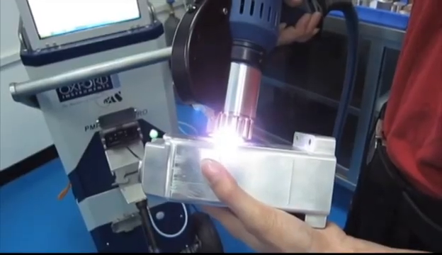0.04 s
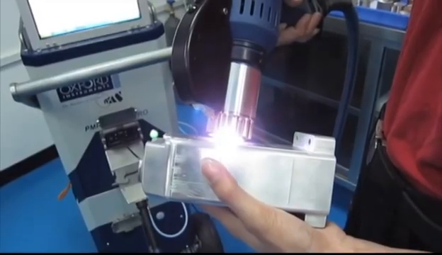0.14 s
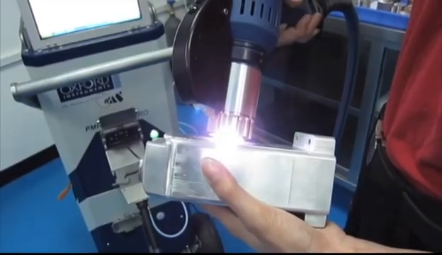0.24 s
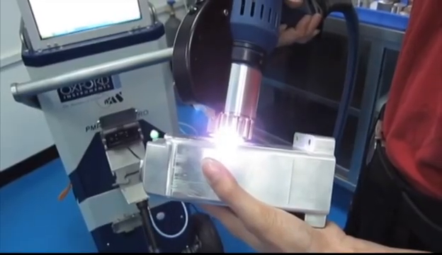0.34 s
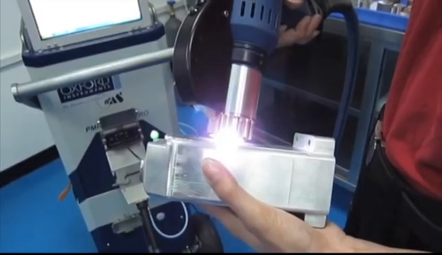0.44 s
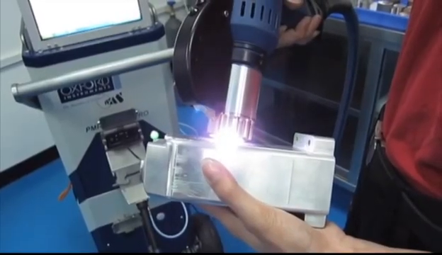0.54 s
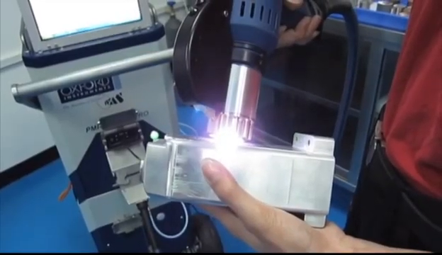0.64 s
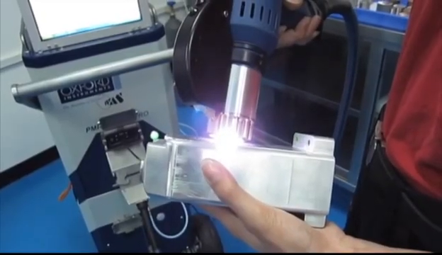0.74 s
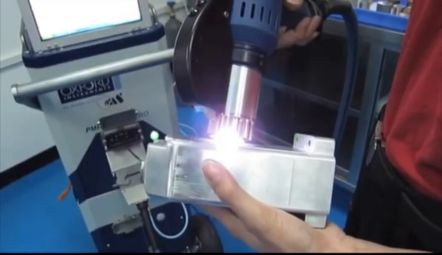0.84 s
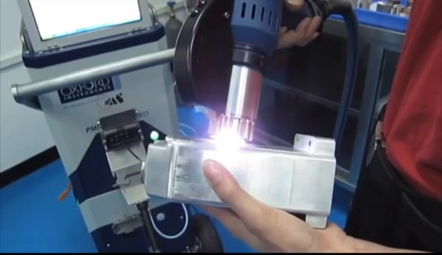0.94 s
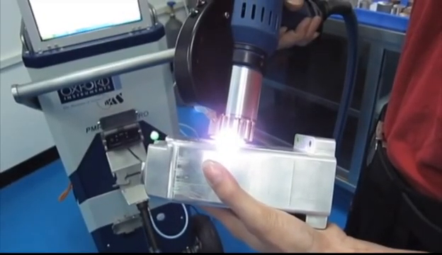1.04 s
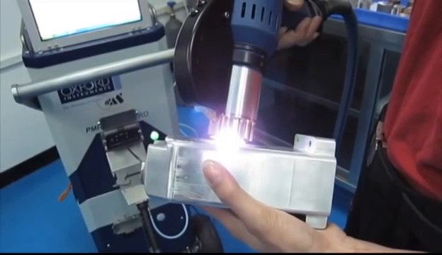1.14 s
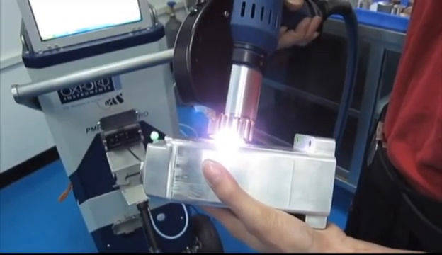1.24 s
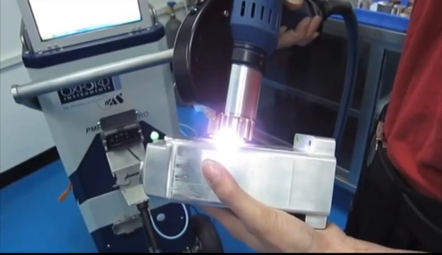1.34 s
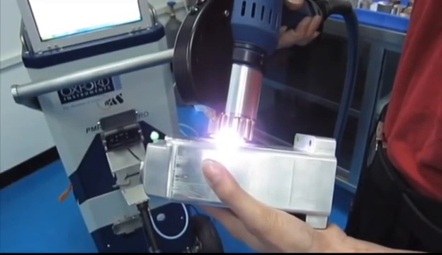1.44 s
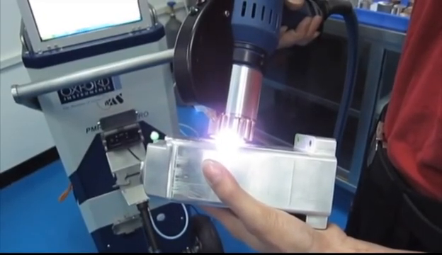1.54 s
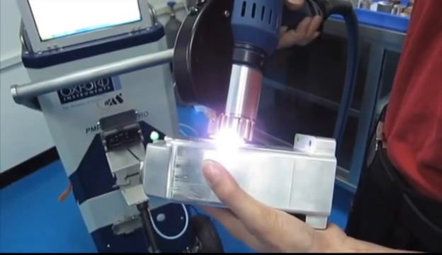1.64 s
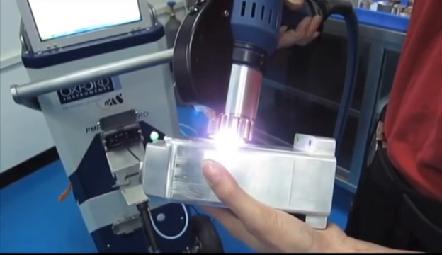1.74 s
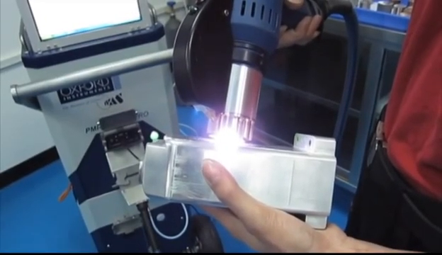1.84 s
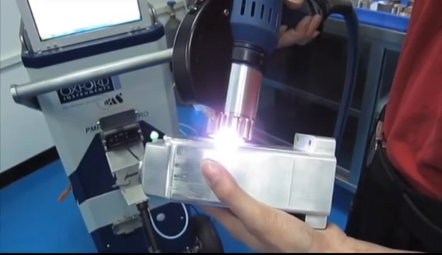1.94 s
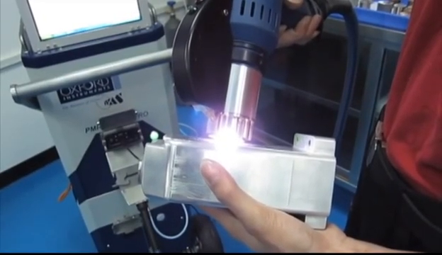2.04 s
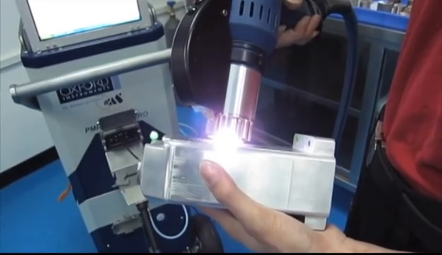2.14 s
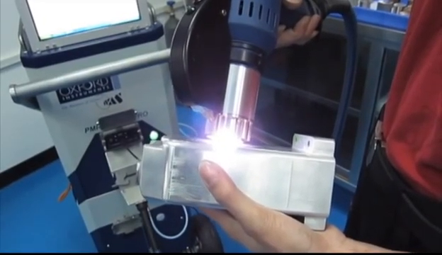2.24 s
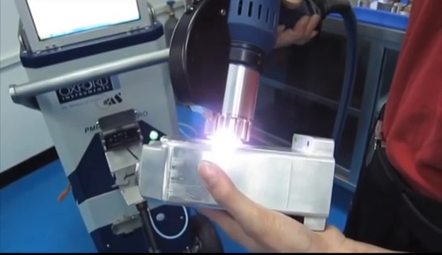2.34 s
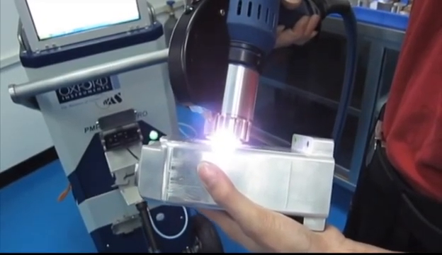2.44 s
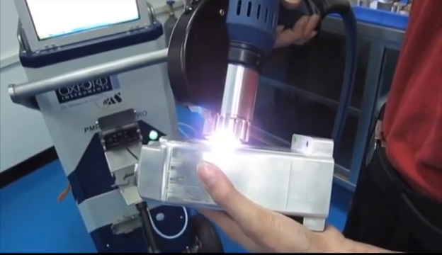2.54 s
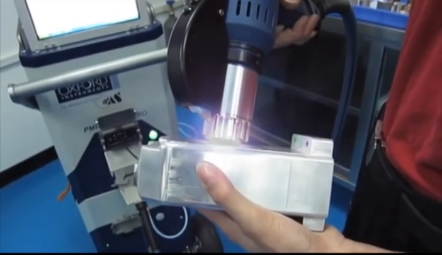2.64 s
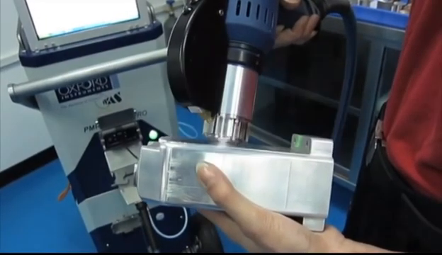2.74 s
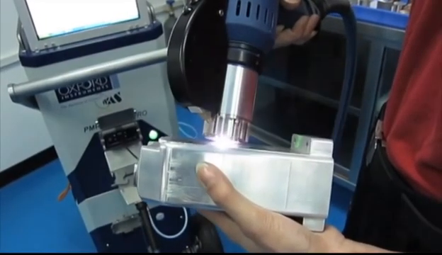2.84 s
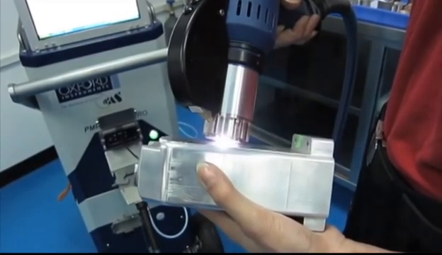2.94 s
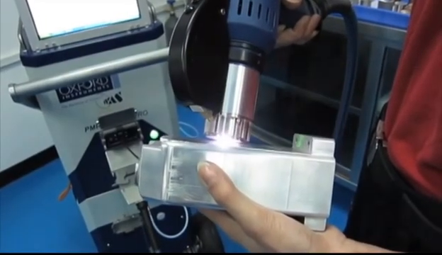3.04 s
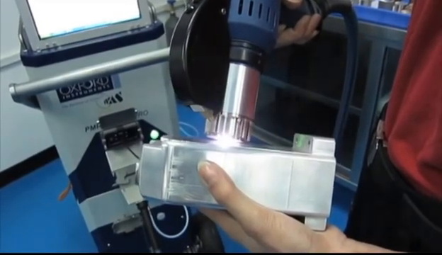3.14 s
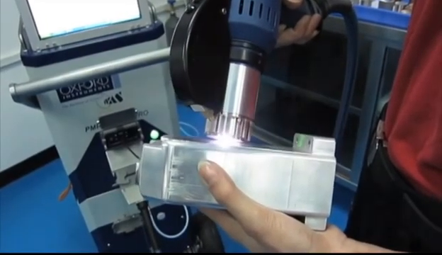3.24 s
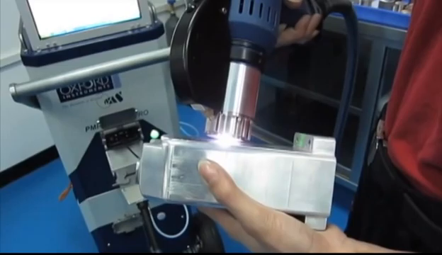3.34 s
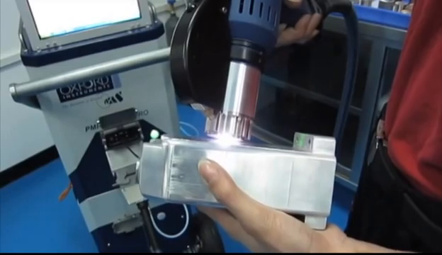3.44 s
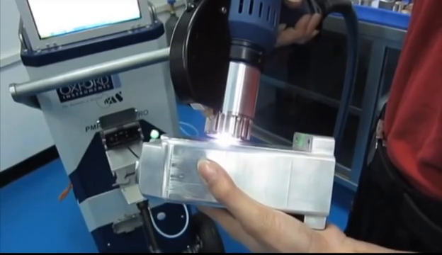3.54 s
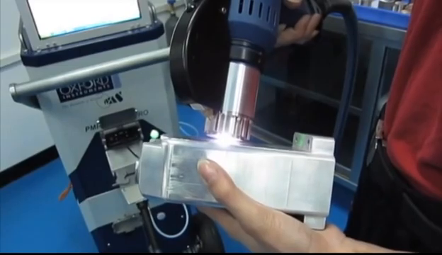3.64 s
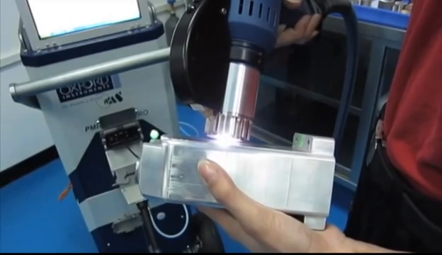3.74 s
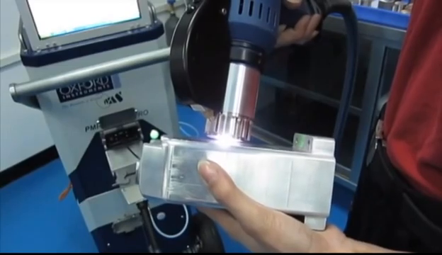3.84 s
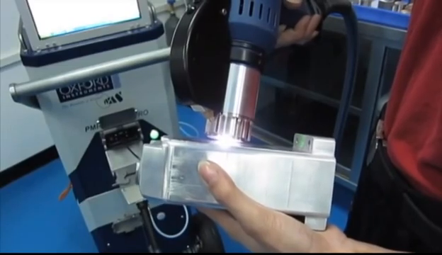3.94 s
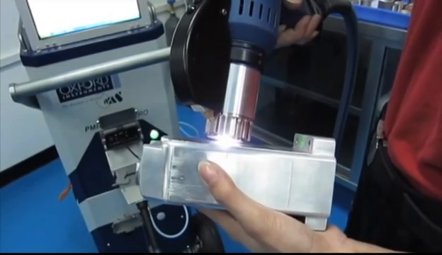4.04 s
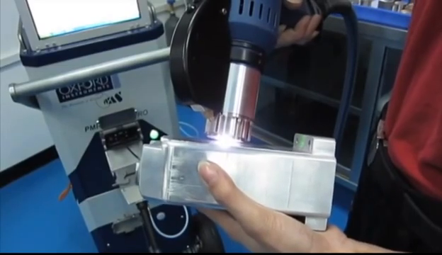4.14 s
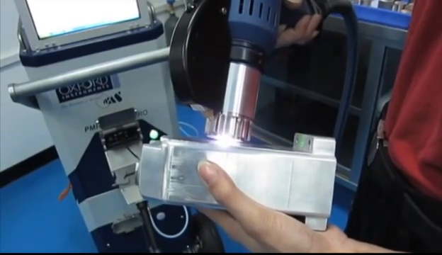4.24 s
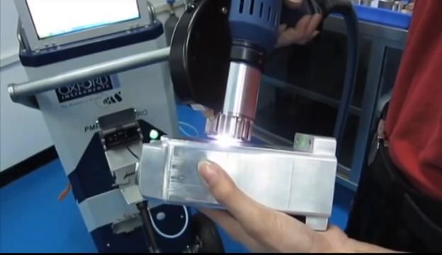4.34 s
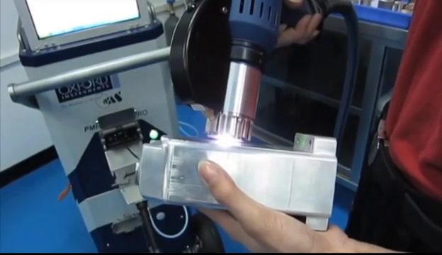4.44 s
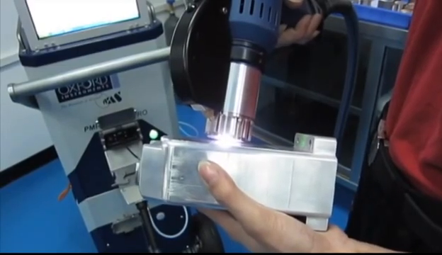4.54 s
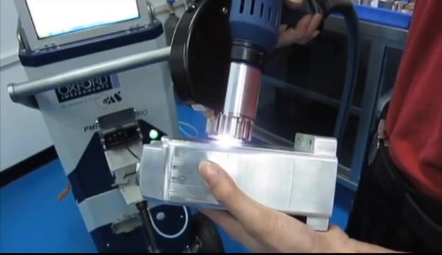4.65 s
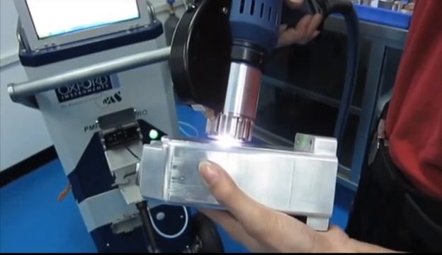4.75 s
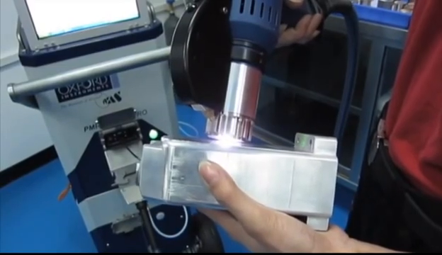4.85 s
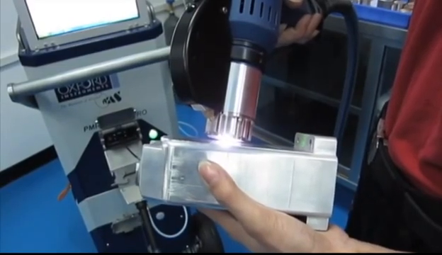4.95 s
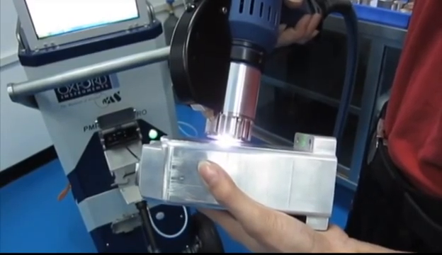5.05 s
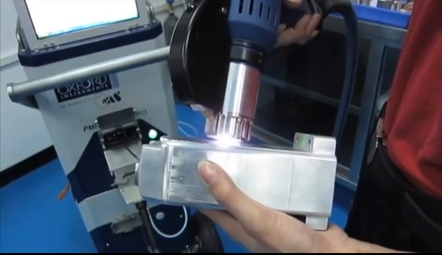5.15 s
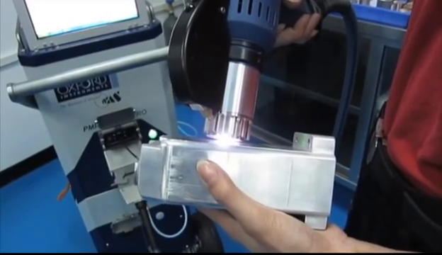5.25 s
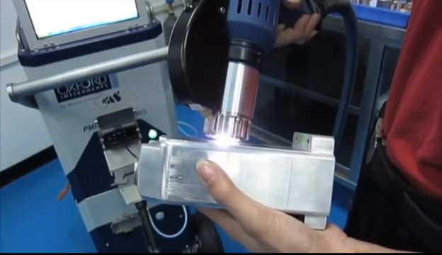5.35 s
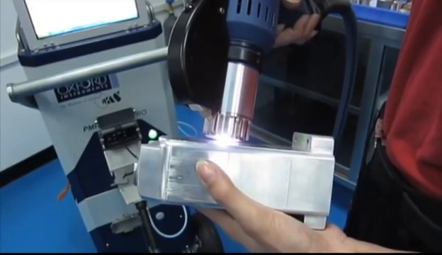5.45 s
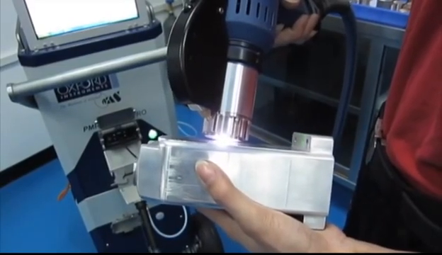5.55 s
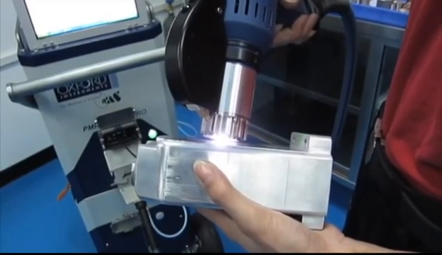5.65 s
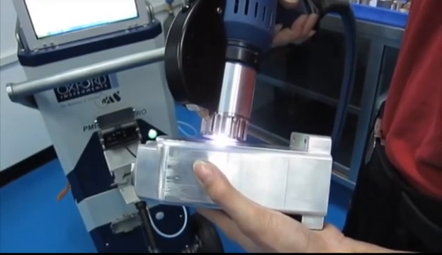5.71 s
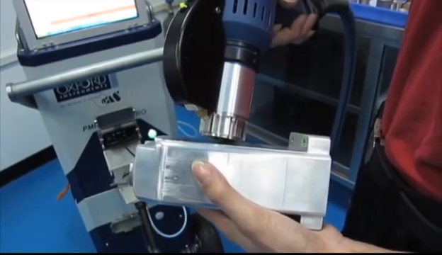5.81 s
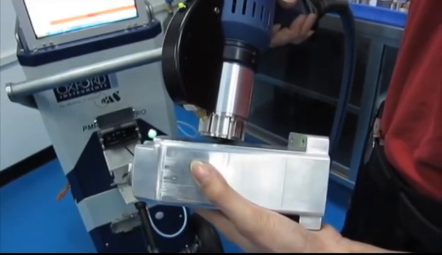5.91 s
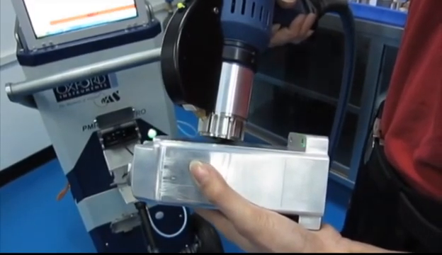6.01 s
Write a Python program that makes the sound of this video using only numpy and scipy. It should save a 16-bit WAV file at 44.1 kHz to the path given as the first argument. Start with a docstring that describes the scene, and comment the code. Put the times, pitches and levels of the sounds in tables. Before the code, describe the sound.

A handheld electric probe sparks against a metal block with a harsh, steady buzz, gritty with sizzle and sputter. Just before halfway it breaks off for an instant, then returns slightly lower and cleaner, with a few single spits. Near the end it cuts off, and the workshop rings briefly over a very faint ventilation rumble. The sparking sounds close to the microphone.

```python
"""A rough, sputtering buzz: a handheld spark probe burns a metal block, 343 sparks a second.
After a short pause comes a cleaner buzz, 291 a second, with single spits. Each spark gives the same
crack, so the train fuses into a tone; hot gas puffs out and the burning spot sizzles.
When the sparks stop, the workshop rings on over a faint ventilation rumble."""
import sys
import numpy as np
from scipy import signal
from scipy.fft import irfft
from scipy.io import wavfile
from scipy.ndimage import uniform_filter1d

SR = 44100
rng = np.random.default_rng(int(sys.argv[2]) if len(sys.argv) > 2 else 0)


def int16_out(signal):
    """Quantize to a 16-bit WAV file."""
    q = np.round(np.clip(np.atleast_2d(signal).T, -1, 1) * 32767)
    wavfile.write(sys.argv[1], SR, q.astype(np.int16))


N = 268039
TIME = np.arange(-SR, N) / SR  # the first burn is already under way at 0 s

# colour of the ventilation: f/Hz, relative level/dB
VENT_SPECTRUM = [(20, -7), (60, -30), (100, -7), (140, -13), (220, -2.5), (350, -12), (600, -13),
                 (1200, -15), (3000, -22), (8000, -42), (15000, -38)]
# diffuse tail of the workshop: f/Hz, relative level/dB, t60/s
ROOM_TAIL = [(100, -11, 0.2), (318, -30.5, 0.92), (774, -15, 1), (1950, -19.5, 1), (4300, -1, 1),
             (6060, -5, 0.8), (9250, -2, 0.51), (14900, 2, 0.28)]
# early reflections off cabinet, floor and bench: left delay/s, right delay/s, relative level/dB
EARLY_REFLECTIONS = [(.0036, 0.0046, -9.5), (.0078, 0.0089, -32), (0.0118, 0.014, -21)]
# hiss of the burning spot: f/Hz, rough relative level/dB, clean relative level/dB
SIZZLE_SPECTRUM = [(200, -9, 1), (700, 2.5, -3), (1270, 2, 3), (2500, 0.5, 3), (4480, -0.5, -1),
                   (6540, -4, -3), (7600, -7, -6), (9770, -20, -3), (11100, -21, -23), (14900, -18, -13)]
# push of hot gas from one spark: f/Hz, relative level/dB
PUFF_SPECTRUM = [(20, -8.5), (60, 0.5), (130, 7), (250, -1), (500, -4), (900, -12), (1500, -17),
                 (3000, -28.5), (5000, -46.5), (10000, -59.5)]
# single sparks that blow out harder than the rest: t/s, relative level/dB
SPIT_CUES = [(0.047, -21), (0.211, -21.5), (0.324, -29), (0.794, -21.5), (1.147, -21.5), (1.161, -25),
             (1.211, -24), (1.337, -21), (1.537, -20), (1.552, -20), (1.569, -21.5), (2.29, -22.5),
             (2.66, -29), (2.792, -30), (3.081, -28), (3.675, -29.5), (3.699, -32), (4.286, -31),
             (4.558, -27.5), (4.609, -33), (4.716, -28), (5.022, -30), (5.136, -29), (5.245, -34)]
# tone of the rough spark train, heard left and right; the lines near 11 kHz are almost silent: harmonic number,
# left level/dB, right level/dB
ROUGH_HARMONICS = [(1, -45, -43), (2, -49, -47), (3, -51, -50), (4, -53, -50), (5, -55, -48), (6, -61, -44),
                   (7, -51, -63), (8, -52, -55), (9, -51, -49), (10, -56, -53), (11, -54, -51),
                   (12, -59, -61), (13, -63, -57), (14, -50, -53), (15, -43, -49), (16, -62, -57),
                   (17, -51, -42), (18, -42, -57), (19, -50, -41), (20, -44, -47), (21, -53, -57),
                   (22, -46, -46), (23, -50, -52), (24, -56, -56), (25, -59, -51), (26, -52, -54),
                   (27, -51, -62), (28, -55, -55), (29, -65, -59), (30, -68, -65), (31, -90, -90),
                   (32, -90, -90), (33, -86, -83), (34, -73, -77), (35, -61, -65), (36, -68, -67),
                   (37, -60, -60), (38, -66, -67), (39, -74, -74), (40, -63, -64), (41, -70, -69),
                   (42, -75, -71), (43, -67, -78), (44, -65, -64), (45, -79, -75)]
# tone of the clean spark train, heard left and right; the lines near 11 kHz are almost silent: harmonic number,
# left level/dB, right level/dB
CLEAN_HARMONICS = [(1, -45, -50), (2, -46, -48), (3, -48, -49), (4, -54, -51), (5, -66, -51), (6, -57, -52),
                   (7, -53, -55), (8, -53, -67), (9, -57, -65), (10, -58, -62), (11, -59, -58),
                   (12, -57, -62), (13, -55, -53), (14, -60, -59), (15, -59, -60), (16, -57, -59),
                   (17, -58, -52), (18, -47, -57), (19, -48, -43), (20, -55, -40), (21, -43, -44),
                   (22, -41, -48), (23, -45, -47), (24, -54, -58), (25, -61, -60), (26, -47, -47),
                   (27, -60, -51), (28, -56, -57), (29, -50, -61), (30, -53, -56), (31, -51, -61),
                   (32, -60, -65), (33, -60, -59), (34, -65, -64), (35, -75, -74), (36, -73, -78),
                   (37, -90, -90), (38, -90, -90), (39, -82, -83), (40, -70, -79), (41, -70, -71),
                   (42, -68, -63), (43, -65, -64), (44, -68, -61), (45, -77, -79), (46, -71, -69),
                   (47, -71, -73), (48, -65, -64), (49, -64, -64), (50, -76, -75), (51, -72, -65),
                   (52, -71, -63), (53, -83, -74)]
# bands where the crack arrives in opposite phase left and right: f/Hz, width/Hz, share (0-1)
ANTIPHASE_BANDS = [(1363, 100, 0.83), (4116, 530, 0.84)]

ROUGH_HZ, CLEAN_HZ, TOP_HZ = 342.99, 291.018, 15700
ROUGH_SPAN_S, CLEAN_SPAN_S = (-0.89633, 2.6735), (2.79238, 5.7185)
SPUTTER_FOLLOWS, SIZZLE_FOLLOWS = 1.5, 0.46  # dB for each dB of spark strength
CRACKLE_ECHO_DB = -3  # sputter and sizzle stir the room less than the buzz does


def gain_of(db):
    """Decibels to amplitude."""
    return 10 ** (np.asarray(db) / 20)


def unit_rms(x):
    """Scales a signal to an RMS of one."""
    return x / np.sqrt(np.mean(x ** 2) + 1e-20)


def curve_at(table, hz, column=1):
    """One column of a spectrum table, on a log-frequency axis."""
    columns = np.transpose(table)
    return np.interp(np.log(hz + 1), np.log(columns[0] + 1), columns[column])


def minimum_phase(db):
    """Phase of the tightest response with these levels, given from 0 Hz upward."""
    log_gain = np.log(gain_of(np.concatenate([db, db[-2:0:-1]])))
    return -signal.hilbert(log_gain).imag[:len(db)]


def response(table, column=1):
    """Impulse response with the given spectrum."""
    db = curve_at(table, np.fft.rfftfreq(4096, 1 / SR), column)
    return irfft(gain_of(db) * np.exp(1j * minimum_phase(db)))[:2048]


def through(x, impulse):
    """Convolves one or two channels with a response."""
    return signal.oaconvolve(np.atleast_2d(x), np.atleast_2d(impulse), axes=1)[:, :len(TIME)]


def stereo_noise(correlation):
    """White noise, partly shared by both channels."""
    shared, left, right = rng.standard_normal((3, len(TIME)))
    return np.sqrt(correlation) * shared + np.sqrt(1 - correlation) * np.array([left, right])


def sway(fastest_hz):
    """Smooth random modulation, up to the given rate."""
    t, rates = TIME[::128], np.geomspace(fastest_hz / 6, fastest_hz, num=16)
    waves = sum(np.sin(2 * np.pi * (hz * t + rng.random())) / np.sqrt(hz) for hz in rates)
    return np.interp(TIME, t, unit_rms(waves))


def looped(partials, cycles, size=32768):
    """Plays a wavetable of these harmonics once for every spark."""
    wavetable = irfft(np.pad(np.atleast_2d(partials), ((0, 0), (1, 0))), size) * size / np.sqrt(2)
    return wavetable[:, (cycles * size).astype(int) % size]


def ventilation(level_db=-71):
    """The bed: a faint, steady rumble of moving air."""
    return gain_of(level_db) * unit_rms(through(stereo_noise(0.98), response(VENT_SPECTRUM)))


def workshop(predelay_s=0.0039):
    """Room response: a few early reflections and a diffuse tail, each band dying at its own speed."""
    late = np.arange(SR) / SR > predelay_s
    hz, t, bands = signal.stft(rng.standard_normal((2, SR)) * late, SR, nperseg=256)
    decay_rate = np.log(1000) / curve_at(ROOM_TAIL, hz, column=2)[:, None]
    decay = np.exp(-decay_rate * t) * np.sqrt(2 * decay_rate / SR)  # unit energy per band
    bands *= gain_of(curve_at(ROOM_TAIL, hz)[:, None]) * decay
    echo = signal.istft(bands, SR, nperseg=256)[1][:, :SR]
    for left_s, right_s, db in EARLY_REFLECTIONS:
        echo[[0, 1], [round(left_s * SR), round(right_s * SR)]] += gain_of(db)
    return echo


def sizzle(cycles, excess, level_db, flare_db, colour, fade_cycles=0.53):
    """A burst of hiss follows each spark and flares up with the strong ones."""
    spark = np.clip(cycles.astype(int), 0, len(excess) - 1)
    flare = gain_of(flare_db) * np.maximum(excess, 0)[spark]
    bursts = unit_rms(stereo_noise(0.061) * np.exp(-(cycles % 1) / fade_cycles))
    return through((gain_of(level_db) + flare) * bursts, colour / np.linalg.norm(colour))


def sputter(spark_times, excess, carry):
    """Uneven puffs of hot gas; a weak spark leaves part of its charge to the next."""
    pushes = np.zeros(len(TIME))
    pushes[np.searchsorted(TIME, spark_times)] = excess - carry * np.append(excess[1:], 0)
    puff = response(PUFF_SPECTRUM)
    return through(-pushes, puff / puff.max())


def spark_excess(spark_times, spread_db, spit_trim_db, skew):
    """How much stronger or weaker than average each spark fires; the spits stand out."""
    chance = np.minimum(rng.exponential(1, len(spark_times)), 3) ** skew
    excess = unit_rms(chance - chance.mean()) * gain_of(np.interp(spark_times, TIME, spread_db))
    for when, db in SPIT_CUES:
        gap_s = abs(spark_times - when)
        if gap_s.min() < spark_times[1] - spark_times[0]:
            excess[gap_s.argmin()] = gain_of(db + spit_trim_db)
    return excess


def buzz(harmonics, hz, cycles, strength, echo, scatter_rad, scatter_hz, wander, flutter, width=1.064):
    """Every spark gives the same crack, so the train is a steady stack of harmonics."""
    number, *sides_db = np.transpose(harmonics)
    partial_hz, levels = number * hz, gain_of(sides_db)
    # reflections off block and probe shape the crack on each side and smear its treble
    side_phase = np.array([minimum_phase(np.r_[db[0], db])[1:] for db in sides_db])
    treble = np.minimum(partial_hz / scatter_hz, 1)
    phase = side_phase.mean(0) + scatter_rad * treble * rng.standard_normal(len(number))
    spread = width * (side_phase - side_phase.mean(0))
    antiphase = sum(share * np.exp(-((partial_hz - centre_hz) / width_hz) ** 2)
                    for centre_hz, width_hz, share in ANTIPHASE_BANDS)
    spread += antiphase * (np.array([[1], [-1]]) * np.pi / 2 - spread)
    standing = -levels * np.exp(1j * (phase + spread))
    # the room is fed from all directions, so by a smoother spectrum
    radiated = -np.sqrt(uniform_filter1d(np.mean(levels ** 2, 0), size=3)) * np.exp(1j * phase)
    # direct sound and echo add up to the standing wave at the listener
    room_gain = echo @ np.exp(-2j * np.pi * np.outer(np.arange(SR) / SR, partial_hz))
    direct = looped(standing - room_gain * radiated, cycles)
    # as the hand moves, the near reflections shift and overtones swell or fade
    for _ in range(2):
        shift = treble * radiated * np.exp(2j * np.pi * rng.random(levels.shape))
        direct += wander * sway(fastest_hz=0.99) * looped(shift, cycles)
    # the spark's foot dances on the metal, so the crack turns brighter and duller
    direct += flutter * sway(fastest_hz=46.05) * looped(standing * partial_hz / TOP_HZ, cycles)
    return strength * direct + through(strength * looped(radiated, cycles), echo)


def burn(span_s, hz, harmonics, drive_db, room, hiss_colour, buzz_db, sizzle_db, flare_db, uneven_db,
         spit_trim_db, restless_db, echo_db, skew, carry, **buzz_voicing):
    """One train of sparks at a steady rate: buzz, sizzle and sputter, with their echo."""
    start, stop = span_s
    spark_times, cycles = np.arange(start, stop, 1 / hz), (TIME - start) * hz
    gate = uniform_filter1d(1.0 * ((TIME > start - 0.1 / hz) & (TIME < stop)), size=8)
    echo = gain_of(echo_db) * room
    # calmer and wilder moments come at random, in sputter and sizzle together
    activity_db = drive_db + restless_db * sway(fastest_hz=6.0)
    excess = spark_excess(spark_times, uneven_db + SPUTTER_FOLLOWS * activity_db, spit_trim_db, skew)
    hiss = sizzle(cycles, excess, sizzle_db + SIZZLE_FOLLOWS * activity_db, flare_db, hiss_colour)
    crackle = gate * hiss + sputter(spark_times, excess, carry)
    tone = buzz(harmonics, hz, cycles, gate * gain_of(buzz_db + drive_db), echo, **buzz_voicing)
    return tone + crackle + gain_of(CRACKLE_ECHO_DB) * through(crackle, echo)


def rough_burn(room, sag_db=-0.7, sag_at_s=1.46, sag_ease_s=0.099):
    """Gritty, sputtering sparks whose strength sags a little halfway through."""
    drive_db = sag_db * (1 + np.tanh((TIME - sag_at_s) / sag_ease_s)) / 2
    return burn(ROUGH_SPAN_S, ROUGH_HZ, ROUGH_HARMONICS, drive_db, room,
                hiss_colour=response(SIZZLE_SPECTRUM, column=1), sizzle_db=-47.0, flare_db=-12.0,
                uneven_db=-35.8, spit_trim_db=-4.0, restless_db=0.2, skew=0.93, carry=0.81,
                buzz_db=-0.13, echo_db=2.0, scatter_rad=1.1, scatter_hz=1880, wander=0.12, flutter=0.12)


def clean_burn(room, cold_db=-4, warm_up_s=0.29):
    """Smoother sparks with single spits; they start weak and build to full strength."""
    drive_db = cold_db * np.exp(-np.maximum(TIME - CLEAN_SPAN_S[0], 0) / warm_up_s)
    return burn(CLEAN_SPAN_S, CLEAN_HZ, CLEAN_HARMONICS, drive_db, room,
                hiss_colour=response(SIZZLE_SPECTRUM, column=2), sizzle_db=-55.5, flare_db=-11.5,
                uneven_db=-49.5, spit_trim_db=-4.2, restless_db=0.96, skew=2.3, carry=0.032,
                buzz_db=-0.1, echo_db=-1.0, scatter_rad=0.77, scatter_hz=3250, wander=0.2, flutter=0.13)


def scene():
    """The rough burn, a pause and the clean burn, over the ventilation bed."""
    room = workshop()
    return (rough_burn(room) + clean_burn(room) + ventilation())[:, -N:]


def record(dry):
    """A steep high cut takes the very top off the mix."""
    high_cut = signal.firwin(511, TOP_HZ, window=("kaiser", 9), fs=SR)
    return signal.oaconvolve(dry, high_cut[None], "same")


dry = scene()
out = record(dry)
int16_out(out)
```